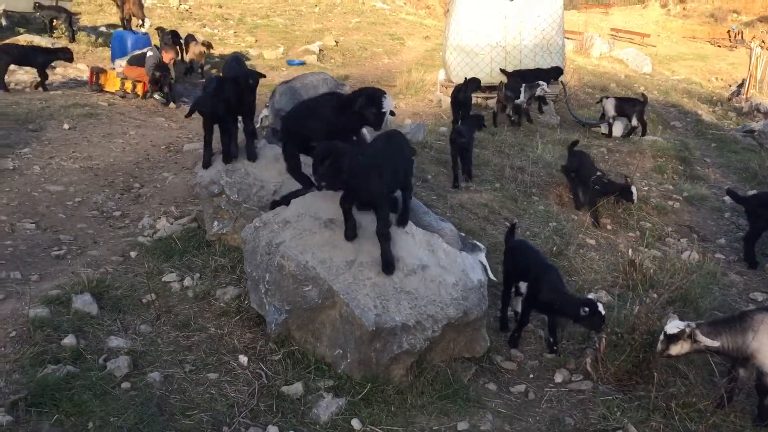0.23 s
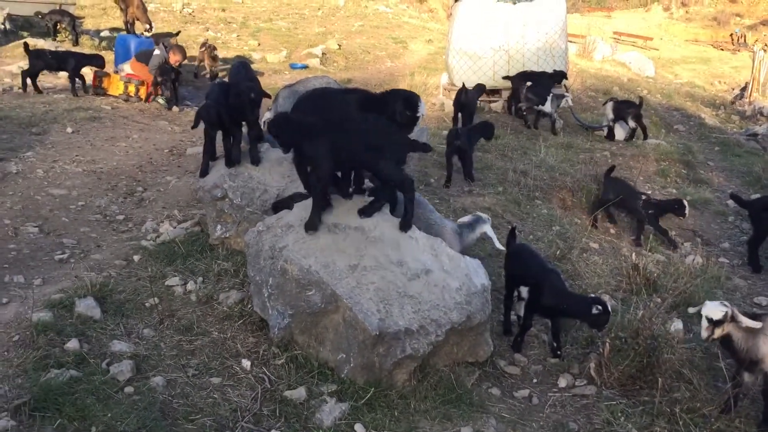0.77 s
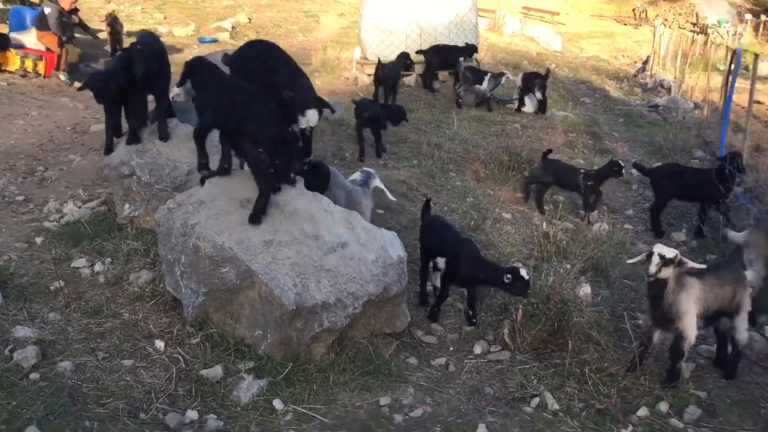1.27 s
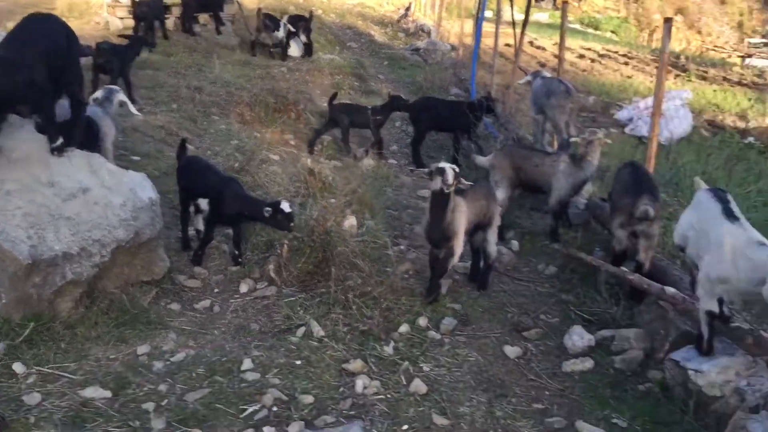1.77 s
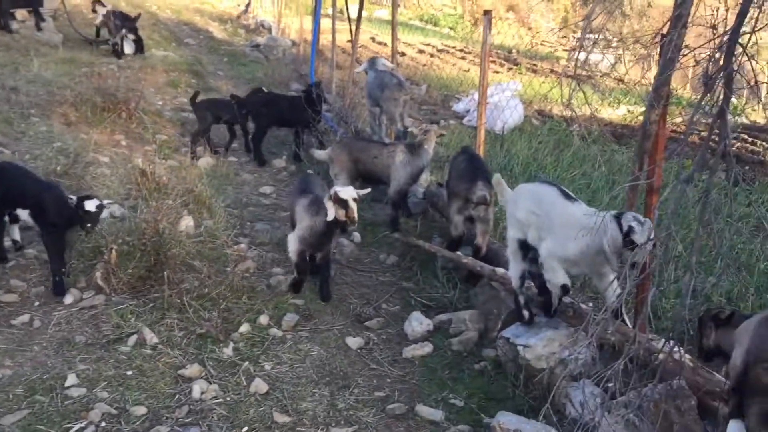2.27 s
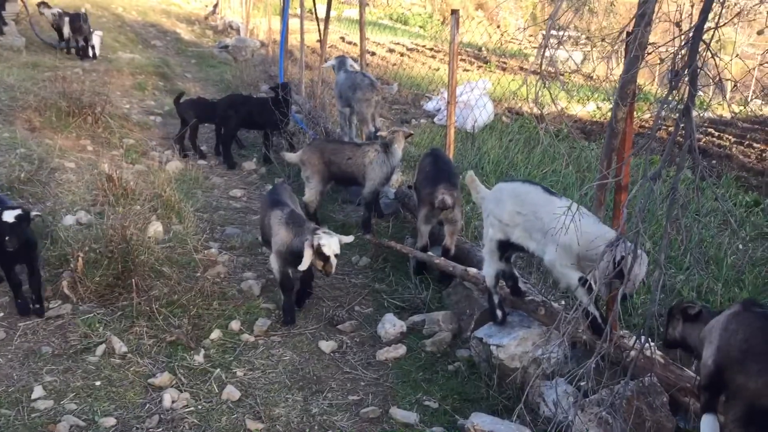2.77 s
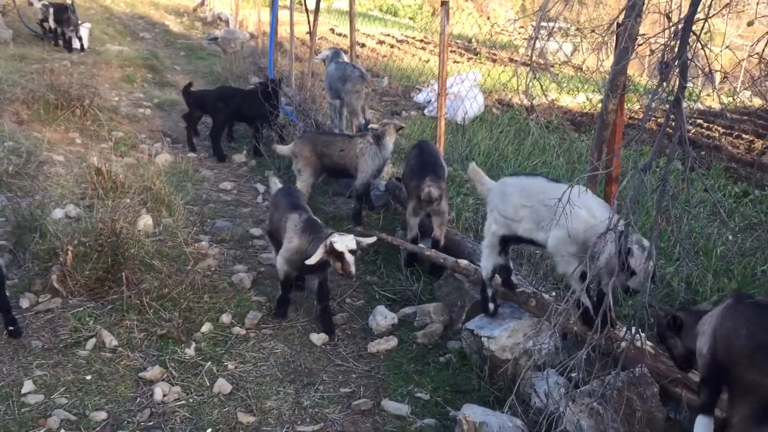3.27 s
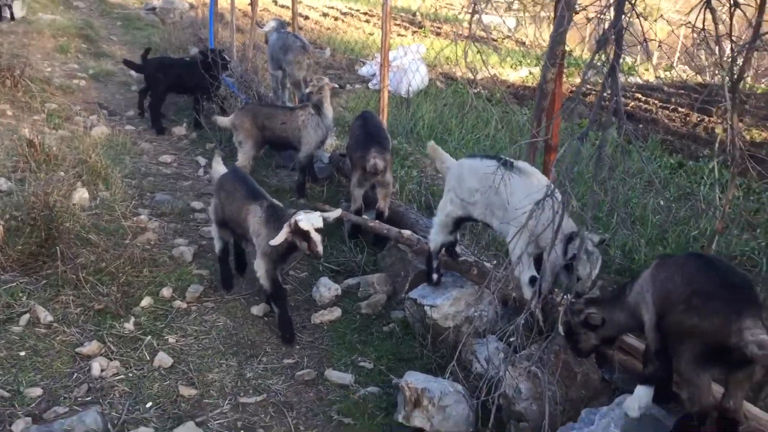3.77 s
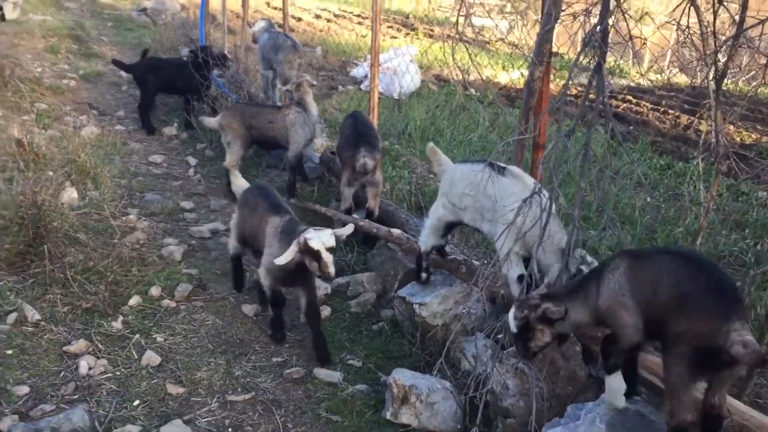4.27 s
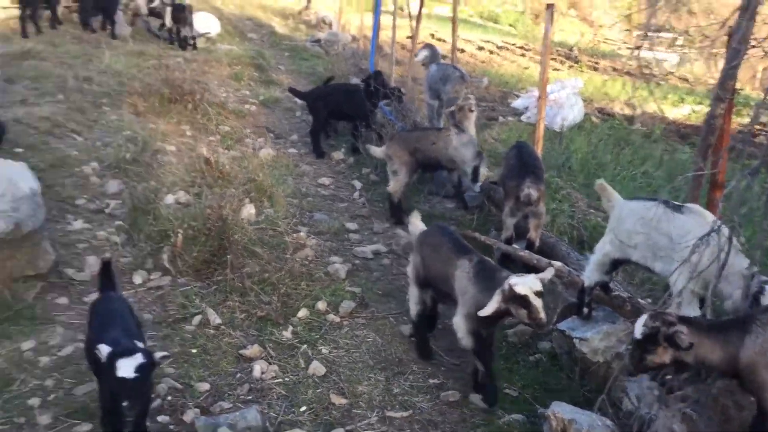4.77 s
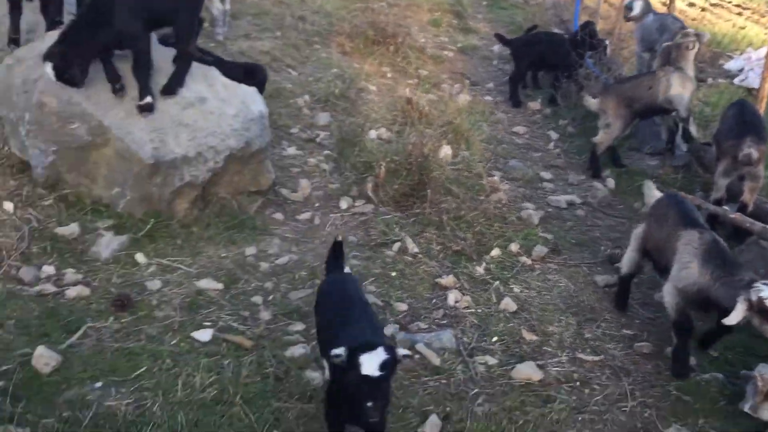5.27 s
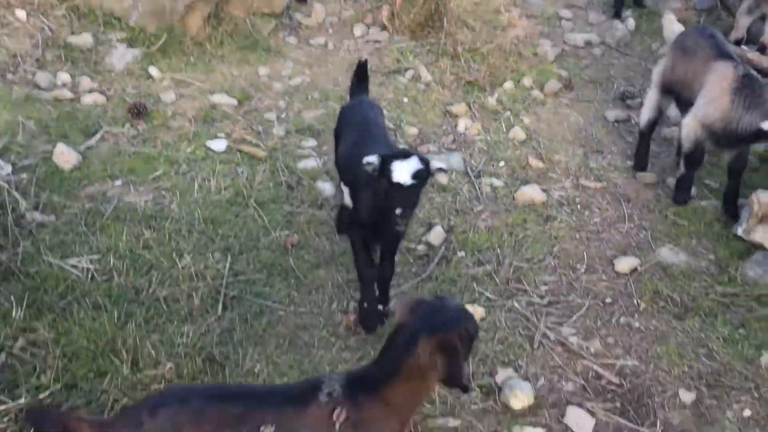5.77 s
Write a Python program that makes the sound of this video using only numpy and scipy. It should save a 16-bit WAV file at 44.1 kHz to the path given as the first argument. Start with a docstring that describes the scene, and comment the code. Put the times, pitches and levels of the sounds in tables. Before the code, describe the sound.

Young goats clamber over rock and trot across stony pasture, their hooves thudding and knocking irregularly close by. Loose stones tock, dry grass crackles and stalks snap. Small birds chip and whistle faintly early on, then twitter in the distance. The steps grow heavier around the middle and again near the end, where one leaves a hollow hum. A faint outdoor hush and soft wind rumble on the microphone lie underneath.

```python
"""Hooves thud and knock as goat kids clamber over a boulder and trot across open, stony pasture.
Their weight thumps the packed earth and sets loose stones tocking, horn on grit makes the rock ring,
and one step leaves a hollow hum. Dry grass crackles against their legs and stalks snap.
Small birds chip, whistle and twitter in gliding tones, and one hoarse note comes from far off.
Under it all lie a faint hush, the shuffle of the herd and puffs of air rumbling on the microphone."""
import sys
import numpy as np
from scipy import signal
from scipy.io import wavfile

SR = 44100
rng = np.random.default_rng(int(sys.argv[2]) if len(sys.argv) > 2 else 0)


def log_audio(samples):
    """Write samples as a 16-bit WAV file to the path given in sys.argv[1]."""
    # one column per channel
    frames = np.atleast_2d(samples).T
    # limit to full scale, then quantise
    limited = np.clip(frames, -1, 1)
    pcm = np.round(limited * 32767).astype(np.int16)
    wavfile.write(sys.argv[1], SR, pcm)


N = 265482
TIME = np.arange(N) / SR
CUTOFF_HZ = 15950

# tone colour of dry grass: f/Hz, relative level/dB
GRASS_SPECTRUM = [(700, -34), (1500, -14), (3500, 4), (6000, 0.5), (8500, -1), (10300, -2), (12500, 1.5),
                  (15500, -1.5)]


def from_db(db):
    """Decibels to linear gain."""
    return 10 ** (np.asarray(db) / 20)


def rms_one(x):
    """Normalises a signal to rms 1."""
    return x / np.sqrt(np.mean(x ** 2) + 1e-20)


def in_time(rows):
    """Turns breakpoints into one automation curve per column."""
    times, *columns = np.transpose(rows)
    return [np.interp(TIME, times, column) for column in columns]


def at_hz(points, hz):
    """Reads a curve on a log-frequency axis."""
    freqs, values = np.transpose(points)
    return np.interp(np.log(hz), np.log(freqs), values)


def add(out, s, sound):
    """Mixes a sound in at time s."""
    start = int(np.clip(round(s * SR), 0, N - 1))
    out[start:start + len(sound)] += sound[:N - start]


def band(x, low_hz, high_hz, order=2):
    """Causal band-pass."""
    edges = [max(low_hz, 10), min(high_hz, .45 * SR)]
    return signal.sosfilt(signal.butter(order, edges, "band", fs=SR, output="sos"), x + 1e-18)


def ring(x, hz, t60):
    """A resonator with gain 1 at its peak."""
    radius, angle = from_db(-60 / (t60 * SR)), 2 * np.pi * hz / SR
    feedforward = np.array([1, 0, -1]) * (1 - radius ** 2) / 2
    return signal.lfilter(feedforward, [1, -2 * radius * np.cos(angle), radius ** 2], x + 1e-18)


def tone(hz):
    """A sine following a pitch curve."""
    return np.sin(2 * np.pi * np.cumsum(hz) / SR)


def drift(per_s):
    """Random modulation gliding through per_s values a second; rms 1."""
    knots = rng.standard_normal(int(per_s * N / SR) + 2)
    return rms_one(np.interp(TIME * per_s, np.arange(len(knots)), knots))


def half_octaves():
    """Low edge, high edge and centre of each half-octave band, in Hz."""
    edges = 20 * 2 ** np.arange(0, 10.1, .5)
    return zip(edges, edges[1:], np.sqrt(edges[1:] * edges[:-1]))


def coloured(spectrum, patchy_db, grain=1):
    """Noise in half-octave bands that flicker on their own and share one grain; rms 1."""
    white = rng.standard_normal((2, N)) * grain
    out = np.zeros(N)
    for k, (low, high, hz) in enumerate(half_octaves()):
        level_db = at_hz(spectrum, hz) + patchy_db * drift(14)
        out += band(white[k % 2], low, high) * from_db(level_db)
    return rms_one(out)


def grains(per_s, spread_db, life_s):
    """Envelope of tiny random contacts, each dying at once; spread_db makes a few stand out."""
    born = rng.random(N) < per_s / SR
    sizes = from_db(spread_db * np.minimum(rng.exponential(1, N), 4))
    decay = np.exp(-1 / (life_s * SR))
    return np.sqrt(signal.lfilter([1], [1, -decay], born * sizes ** 2 + 1e-18))


def soft_blows(hits):
    """Cushioned blows: each struck mass swings up at its own pitch and dies away."""
    out, t = np.zeros(N), TIME[:SR // 6]
    for s, db, hz, swell_s in hits:
        envelope = t / swell_s * np.exp(1 - t / swell_s)
        add(out, s, from_db(db) * envelope * np.sin(2 * np.pi * hz * t))
    return out


def hillside(x, predelay_s=0.0068):
    """Scattered reflections from boulders and slope, the bass lasting longest; wet signal only."""
    # reverb decay: f/Hz, t60/s
    decay_times = [(100, 0.43), (500, 0.19), (2000, 0.1), (8000, 0.16)]
    t = TIME[:SR // 2]
    white = rng.standard_normal((2, len(t)))
    tail = sum(band(white[k % 2], low, high) * from_db(-60 * t / at_hz(decay_times, hz))
               for k, (low, high, hz) in enumerate(half_octaves()))
    tail *= t > predelay_s
    return signal.fftconvolve(x, tail / np.sqrt(np.sum(tail ** 2)))[:N]


def near_echoes(x, echo_db, spread_s):
    """The direct sound plus six early reflections off nearby stones."""
    taps = np.zeros(SR // 10)
    taps[0] = 1
    delays = (rng.uniform(.1, 1, 6) * spread_s * SR).astype(int)
    taps[delays] = from_db(echo_db) * rng.choice([-1, 1], len(delays))
    return signal.fftconvolve(x, taps)[:N]


def pasture_bed(shuffle_trim_db=3.0, crackle_trim_db=-8.5):
    """Outdoor hush, with the shuffle and rustle of the farther animals."""
    # faders for the herd milling about: t/s, ground level/dB, grass level/dB
    herd_faders = [(0.0, -72.5, -71.5), (0.74, -72, -70), (1.99, -73, -70.5), (2.43, -72, -68),
                   (3.1, -68, -70.5), (3.55, -71.5, -69), (4.54, -73.5, -71.5), (4.79, -68.5, -70),
                   (5.2, -66, -62.5), (5.73, -65.5, -69), (6.02, -64, -68.5)]
    # tone colour of the ground's murmur: f/Hz, relative level/dB
    murmur_spectrum = [(80, 4), (150, 6.5), (300, -0.5), (600, -5), (1200, -6.5), (2200, -13), (3200, -17),
                       (5000, -42)]
    # tone colour of the hush: f/Hz, relative level/dB
    hush_spectrum = [(1200, -1), (2400, 14.5), (3200, 7), (4200, 8), (5000, 7), (6200, 6), (8000, 5),
                     (10300, -4), (12500, 1), (15500, -0.5)]
    ground_db, grass_db = in_time(herd_faders)
    shuffle = from_db(1.5 * drift(40)) * coloured(murmur_spectrum, patchy_db=1.3)
    hush = coloured(hush_spectrum, patchy_db=.6)
    ticks = grains(per_s=70, spread_db=3.0, life_s=.0008)
    crackle = coloured(GRASS_SPECTRUM, patchy_db=1.5, grain=ticks)
    ground = from_db(ground_db + shuffle_trim_db) * shuffle
    grass = from_db(grass_db) * (hush + from_db(crackle_trim_db) * crackle)
    return ground + grass


def breeze(calm_db=-78.5, half_width_s=0.13):
    """Nearly still air; each puff swells and fades as a low rumble on the microphone."""
    # puffs of air at their crest: t/s, level/dB
    puffs = [(2.4, -66), (3.05, -67), (3.96, -55), (5.1, -59.5), (5.6, -54), (6.0, -60)]
    # tone colour of air on the microphone: f/Hz, relative level/dB
    rumble_spectrum = [(20, -40), (35, -13.5), (60, 0.5), (100, -10), (160, -6.5), (400, -45.5)]
    swells = sum(from_db(db) * np.exp(-((TIME - s) / half_width_s) ** 2) for s, db in puffs)
    return (from_db(calm_db) + swells) * coloured(rumble_spectrum, patchy_db=3.5)


def far_call(start_s=1.26, length_s=0.33, hz=2210, db=-73, rasp=0.057):
    """One faint, far-off note swells and fades, hoarse with fast pitch jitter."""
    swell = np.sin(np.pi * np.clip((TIME - start_s) / length_s, 0, 1))
    return from_db(db) * swell * tone(hz * (1 + rasp * drift(900)))


def far_bird(start_s=4.2, step_s=0.057, note_s=0.0363, glide_hz=(3900, 4500), run_db=-65):
    """A far bird twitters an even run of buzzy rising notes, blurred on their way across the slope."""
    # longer slurs that close the song: t/s, length/s, start f/Hz, end f/Hz, level/dB
    slurs = [(4.595, .085, 4550, 4110, -59), (4.8, .075, 4300, 4860, -68)]
    rasp, reverb_db = 0.058, -2.5
    run = [(start_s + k * step_s, note_s, *glide_hz, run_db) for k in range(5)]
    out = np.zeros(N)
    for s, length_s, start_hz, end_hz, db in run + list(slurs):
        n = int(length_s * SR)
        buzz = 1 + rasp * drift(912)[:n]
        swell = np.sin(np.linspace(0, np.pi, n))
        add(out, s, from_db(db) * swell * tone(np.linspace(start_hz, end_hz, n) * buzz))
    return out + from_db(reverb_db) * hillside(out)


def bird_whistle(start_s=2.195, length_s=0.27, db=-61.5, start_hz=9800, rest_hz=7250, sink_s=.145):
    """A thin whistle sinks towards a resting pitch; it is loudest past its middle."""
    out, t = np.zeros(N), TIME[:int(length_s * SR)]
    hz = rest_hz + (start_hz - rest_hz) * np.exp(-t / sink_s)
    waver = 1 + .004 * drift(202.4)[:len(t)]
    swell = np.abs(np.sin(np.pi * (t / length_s) ** 1.3)) ** 1.4
    add(out, start_s, from_db(db) * swell * tone(hz * waver))
    return out


def bird_chips(length_s=0.011, top_hz=8000, scoop=0.45, rise_s=0.0036):
    """A small bird's slightly hoarse chips flick upward, all towards the same top pitch."""
    # chip cues: t/s, peak level/dB
    cues = [(.507, -51.5), (.683, -51.5), (.854, -49.5), (1.084, -47.5), (1.236, -50)]
    out, t = np.zeros(N), TIME[:int(length_s * SR)]
    hz = top_hz * (1 - scoop * np.exp(-t / rise_s))
    swell = np.sin(np.pi * (t / length_s) ** 0.89)
    for s, db in cues:
        hoarse = 1 + .03 * drift(1200)[:len(t)]
        add(out, s, from_db(db) * swell * tone(hz * hoarse))
    return out


def scuffs():
    """Legs brush through crackling dry blades while dragging hooves slip over gravel in coarser jerks."""
    # swelling and fading strokes: t/s, length/s, grass level/dB, grit level/dB
    strokes = [(.17, .045, -69, -67), (0.47, .14, -71.5, -88), (0.697, 0.073, -56.5, -73),
               (1.106, 0.037, -72, -63.5), (1.625, 0.045, -72.5, -72), (2.183, 0.045, -58.5, -63.5),
               (2.472, 0.033, -61, -64), (2.786, .1, -61.5, -67), (2.888, 0.11, -52, -66),
               (3.436, 0.036, -60.5, -71), (3.842, 0.053, -68, -55.5), (3.927, 0.032, -62, -52.5),
               (3.993, 0.06, -65.5, -70), (4.083, .12, -63, -66.5), (4.411, 0.13, -67, -63.5),
               (4.527, .164, -62, -67), (5.08, .1, -68, -53), (5.277, 0.043, -63, -54),
               (5.495, 0.051, -50, -50), (5.644, 0.099, -61, -77), (5.75, 0.16, -65, -80),
               (5.938, 0.034, -80, -50)]
    # tone colour of sliding grit: f/Hz, relative level/dB
    grit_spectrum = [(300, 8.5), (700, -13.5), (1400, 2.5), (2500, -1.5), (3600, -16.5), (6000, -51)]
    brush, drag = np.zeros((2, N))
    for start_s, length_s, brush_db, drag_db in strokes:
        swell = np.sqrt(2) * np.sin(np.pi * np.clip((TIME - start_s) / length_s, 0, 1))
        brush += from_db(brush_db) * swell
        drag += from_db(drag_db) * swell
    crackles = grains(per_s=1300, spread_db=5.5, life_s=0.0018)
    blades = coloured(GRASS_SPECTRUM, patchy_db=2.44, grain=crackles)
    slips = grains(per_s=560, spread_db=0.0, life_s=0.00056)
    gravel = coloured(grit_spectrum, patchy_db=5.0, grain=slips)
    return brush * blades + drag * gravel


def stalk_snaps(click=4.37, band_ratio=1.7):
    """A stalk breaks with one sharp click and a few milliseconds of splintering around its own pitch."""
    # stalks and grit snapping: t/s, peak level/dB, centre f/Hz, t60/s
    breaks = [(.211, -42.5, 13000, 0.02), (.728, -34, 10900, 0.026), (.9665, -46, 11000, 0.022),
              (1.151, -46, 6160, .011), (1.575, -39.5, 6800, 0.0095), (1.973, -38.5, 13100, 0.0087),
              (2.355, -53, 15000, .014), (2.566, -33.5, 3230, 0.017), (2.888, -42, 15000, 0.021),
              (2.9345, -36, 3800, 0.02), (2.9474, -46, 6100, .012), (2.965, -40, 12000, .025),
              (3.22, -42, 13000, 0.023), (3.2944, -39.5, 12200, .013), (3.359, -47, 5500, 0.022),
              (3.547, -43.5, 5070, .014), (3.86, -34.5, 7000, 0.017), (4.105, -37.5, 7060, 0.017),
              (4.1242, -31.5, 11000, 0.0091), (4.2006, -32, 10600, 0.019), (4.576, -42, 10800, .015),
              (4.6492, -27, 6600, .011), (5.1955, -36.5, 9000, 0.036), (5.467, -31, 11700, 0.032),
              (5.8658, -40, 6000, .009), (5.9418, -32, 9000, 0.0061)]
    out, t = np.zeros(N), TIME[:SR // 16]
    for s, db, hz, t60 in breaks:
        splinters = rng.standard_normal(len(t)) * from_db(-60 * t / t60)
        splinters[0] += click
        snap = band(splinters, hz / band_ratio, min(hz * band_ratio, CUTOFF_HZ))
        add(out, s, from_db(db) * snap / np.abs(snap).max())
    return out


def hollow_hum(start_s=5.635):
    """A heavy step sets something hollow humming in two low modes."""
    # modes of the hollow: f/Hz, starting level/dB, t60/s
    modes = [(114, -47, 1.7), (285, -46.5, 0.78)]
    out = np.zeros(N)
    for hz, db, t60 in modes:
        add(out, start_s, from_db(db - 60 * TIME / t60) * np.sin(2 * np.pi * hz * TIME))
    return out


def loose_stones():
    """Loose stones rock under a hoof, each with a short pitched tock."""
    # stone hits: t/s, envelope peak/dB, f/Hz, attack/s
    tocks = [(.444, -47.5, 448, 0.0031), (.594, -51, 439, 0.0084), (.644, -53.5, 622, .003),
             (.778, -48, 644, .003), (1.033, -57, 620, .0045), (1.299, -53.5, 982, 0.0073),
             (1.968, -50, 994, 0.0053), (2.476, -40, 514, 0.00091), (2.822, -46.5, 2520, 0.0026),
             (5.302, -38.5, 380, 0.0042), (5.464, -39.5, 491, 0.0034), (5.581, -33.5, 412, 0.0013),
             (5.623, -31.5, 599, 0.0054), (5.626, -33.5, 457.6, 0.0098), (5.768, -39.5, 610, 0.0041),
             (5.773, -40.5, 442, 0.0053), (5.997, -29.5, 397, 0.0023)]
    return soft_blows(tocks)


def light_steps(per_s=3, db=-68.5, spread_db=4.0, hz=706, spread_octaves=0.47, crack_db=-13.5, t60=0.028):
    """Knock cues for the rest of the herd: faint steps at random moments, each on a different stone."""
    draws = rng.uniform(-1, 1, (int(per_s * N / SR), 3))
    return [(abs(when) * N / SR, db + spread_db * force, hz * 2 ** (spread_octaves * footing),
             crack_db, t60) for when, force, footing in draws]


def hoof_knocks(lead_in_db=-10.0, lead_in_s=0.003, strike=2.96, uneven_db=4.0, ring_db=-3.0):
    """A hoof strikes, then grinds to rest in a dying spray of contacts that ring the rock."""
    # hooves on rock and grit: t/s, level over 20 ms/dB, centre f/Hz, crack mix/dB, t60/s
    steps = [(.194, -57.5, 950, -23, 0.033), (.474, -61, 400, -14.5, 0.028), (1.033, -59, 654, -30, 0.065),
             (1.298, -57, 1330, -21, 0.026), (1.575, -47, 550, -25, 0.0078), (1.645, -59, 630, -11, 0.1),
             (1.732, -61, 433, -36, 0.11), (1.969, -59, 1240, -23, 0.038), (2.121, -51.5, 670, -36, 0.17),
             (2.202, -59.5, 1090, -3, 0.03), (2.215, -53, 470, -7, 0.039), (2.566, -44.5, 1180, 6, 0.0099),
             (2.572, -45, 800, -23, 0.032), (2.608, -56.5, 358, -24, 0.034), (2.661, -53, 440, -12, 0.19),
             (2.681, -45, 720, -13, .04), (2.725, -53, 480, -16.5, 0.041), (2.857, -57.5, 656, -20, 0.017),
             (3.029, -50, 850, -8.5, 0.051), (3.08, -63.5, 700, -18, 0.037),
             (3.141, -49, 770, -19.5, 0.033), (3.165, -60, 290, -16, .11), (3.282, -54, 695, -15, 0.073),
             (3.446, -51.5, 436, -31, 0.21), (3.481, -55.5, 670, -31, .02), (3.62, -48, 780, -12, .007),
             (3.859, -47.5, 1100, 4, 0.028), (3.879, -54.5, 1380, -14, 0.049), (3.913, -52, 1210, -5, 0.13),
             (3.934, -53.5, 915, -1, 0.066), (3.998, -55, 845, -4, 0.075), (4.069, -59, 540, -12, 0.056),
             (4.104, -54, 2200, -1, .008), (4.465, -51, 540, -11.5, 0.085), (5.196, -51, 483, -7, 0.062),
             (5.223, -52.5, 1420, -12, .04), (5.284, -56.5, 626, -11, .1), (5.304, -54.5, 680, -8, 0.074),
             (5.457, -51.5, 684, -10, 0.17), (5.507, -41, 770, -17, 0.055), (5.58, -48, 380, -27, 0.11),
             (5.623, -40, 523, -23, 0.12), (5.841, -44.5, 330, -22.5, 0.088),
             (5.95, -46.5, 665, -26, 0.097), (5.987, -38, 450, -27, 0.089)]
    # modes of the stony ground: f/Hz, relative level/dB, t60/s
    rock_modes = [(410, 0.5, 0.019), (598, -4.5, 0.068), (714, 1, 0.054), (993, -4.5, .12),
                  (1147, -3, 0.016), (1257, 0.5, 0.021), (1507, 1.5, 0.02), (1900, -5, 0.022),
                  (2460, -7, 0.042), (2925, -2, 0.035)]
    band_ratio, crack_band_hz = 1.924, (700, 3400)
    out, lead = np.zeros(N), SR // 64
    t = TIME[:SR // 5] - lead / SR   # the hoof's edge strikes at t = 0
    # each knock swells in over a few milliseconds, softening its attack
    lead_in = from_db(lead_in_db) * np.exp(-np.abs(t) / lead_in_s)
    for s, db, hz, crack_db, t60 in list(steps) + light_steps():
        envelope = np.where(t < 0, lead_in, from_db(-60 * np.abs(t) / t60))
        polarity = rng.choice([-1., 1.], len(t))
        contacts = envelope * polarity * from_db(uneven_db * rng.standard_normal(len(t)))
        contacts[lead] = strike
        size = np.exp(0.0473 * rng.standard_normal())   # no two stones are quite alike
        rock = contacts + sum(from_db(mode_db + ring_db) * ring(contacts, mode_hz / size, mode_t60)
                              for mode_hz, mode_db, mode_t60 in rock_modes)
        # the hardness of the footing picks the modes; the horn adds a dry crack
        body = band(rock, hz / band_ratio, hz * band_ratio, order=3)
        knock = body + from_db(crack_db) * band(rock, *crack_band_hz, order=3)
        rms_20ms = np.sqrt(np.sum(knock ** 2) / (SR // 50))
        add(out, s + t[0], from_db(db) * knock / rms_20ms)
    return out


def hoof_thuds(give_db=-18.5, give_pitch_ratio=0.484, give_stretch=3.05):
    """Each landing thumps, and the earth under it gives with a lower, slower swing."""
    # weight landing on the ground: t/s, envelope peak/dB, f/Hz, attack/s
    landings = [(.192, -49, 145, .0048), (0.329, -46.5, 187, 0.004), (0.371, -38.5, 161, 0.0027),
                (.474, -43, 226, 0.002), (1.578, -35, 72.5, 0.0014), (1.73, -53.5, 168, 0.0054),
                (2.124, -42, 169, 0.0023), (2.136, -45.5, 61, 0.0079), (2.444, -48.5, 64, 0.013),
                (2.664, -37.5, 210, .004), (2.683, -23, 263, 0.0034), (2.692, -36.5, 140, 0.0038),
                (2.724, -45, 267, 0.0046), (2.859, -30.5, 257, 0.0028), (2.99, -42.5, 265, 0.0044),
                (3.033, -30, 272, 0.0031), (3.14, -26.5, 238, 0.003), (3.22, -33.5, 237, .0024),
                (3.283, -42, 270, 0.0037), (3.654, -44, 85, 0.0039), (3.933, -40, 81, 0.0096),
                (3.999, -39.5, 308, 0.0039), (4.905, -37.5, 113, 0.0018), (5.091, -46, 54, 0.0076),
                (5.303, -33, 173.6, 0.0045), (5.561, -31.5, 193, 0.0054), (5.844, -28, 186, 0.0035),
                (5.865, -36.5, 128, 0.0045), (5.996, -30, 158, 0.0066), (6, -29.5, 66.4, 0.017)]
    give = [(s, db + give_db, hz * give_pitch_ratio, swell_s * give_stretch)
            for s, db, hz, swell_s in landings]
    return soft_blows(landings) + soft_blows(give)


def scene(foreground_send_db=-15.0, song_send_db=-19.0):
    """Hooves and grass close by, birds farther off, all on the open slope; mono."""
    knocks = near_echoes(hoof_knocks(), echo_db=-16.5, spread_s=.008)
    hooves = hoof_thuds() + loose_stones() + hollow_hum() + knocks
    foreground = hooves + stalk_snaps() + scuffs()
    song = near_echoes(bird_chips() + bird_whistle(), echo_db=-11.5, spread_s=0.0087)
    reverb = hillside(from_db(foreground_send_db) * foreground + from_db(song_send_db) * song)
    ambience = far_bird() + far_call() + pasture_bed() + breeze()
    return (foreground + song + reverb + ambience)[None]


def record(dry, low_cut_hz=38):
    """The microphone drops the deepest bass; a steep low-pass trims the very top."""
    thinned = signal.sosfilt(signal.butter(4, low_cut_hz, "high", fs=SR, output="sos"), dry)
    return signal.sosfilt(signal.ellip(10, .1, 70, CUTOFF_HZ, fs=SR, output="sos"), thinned)


dry = scene()
out = record(dry)
log_audio(out)
```